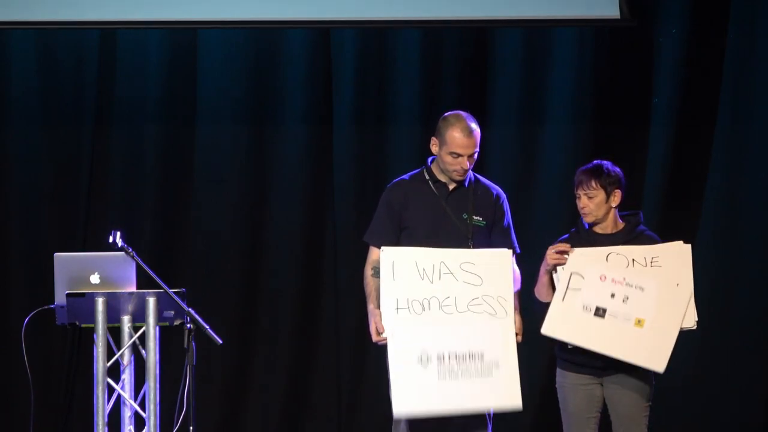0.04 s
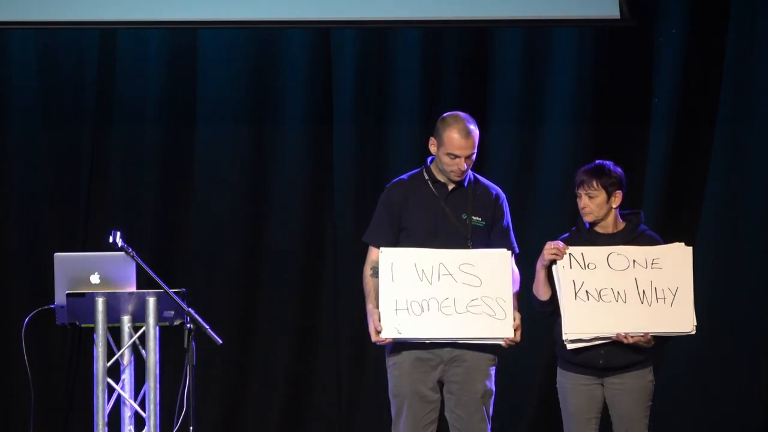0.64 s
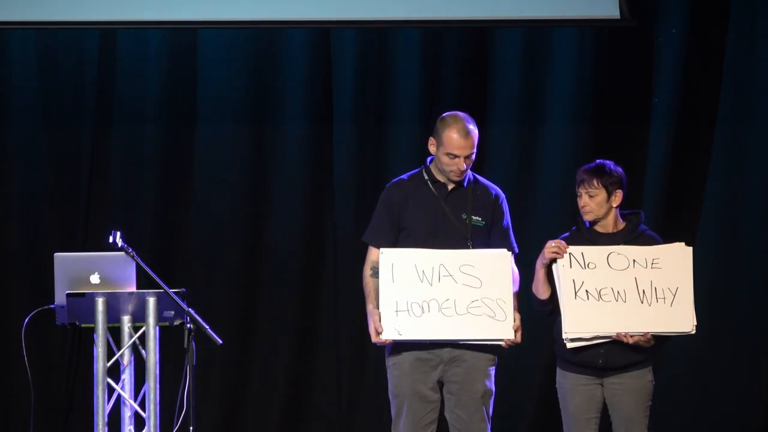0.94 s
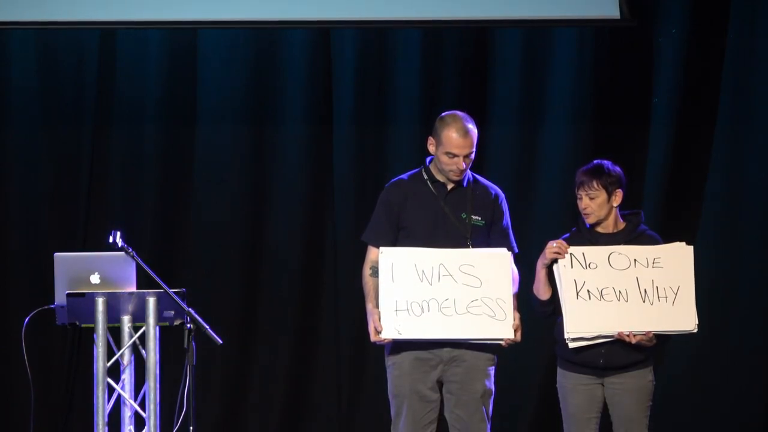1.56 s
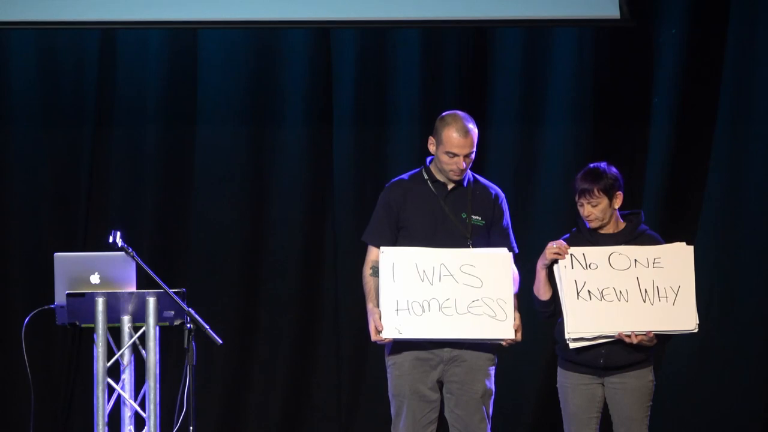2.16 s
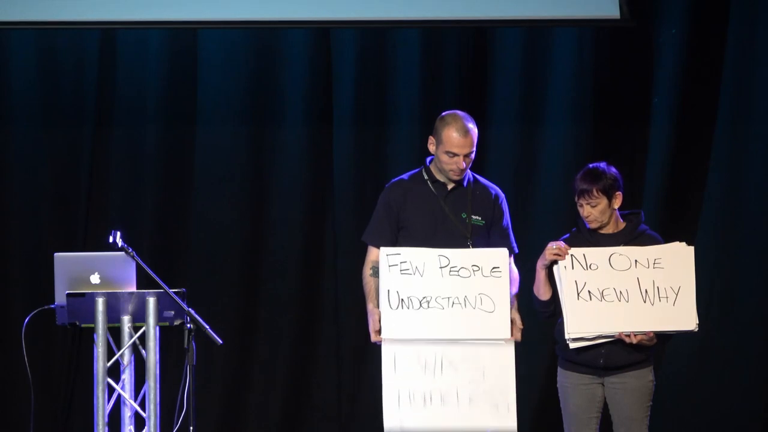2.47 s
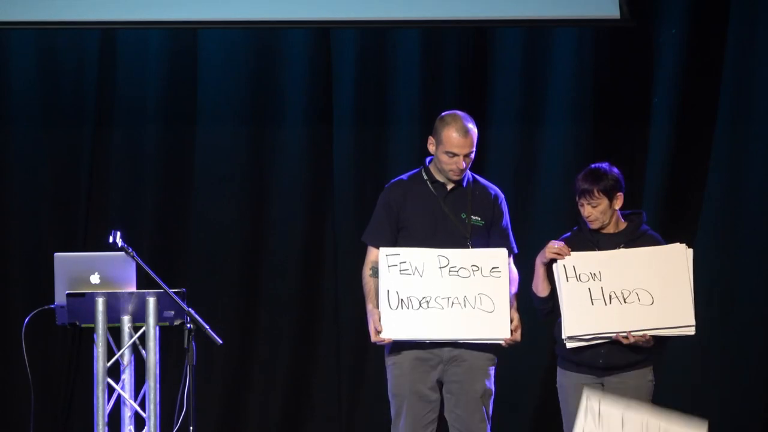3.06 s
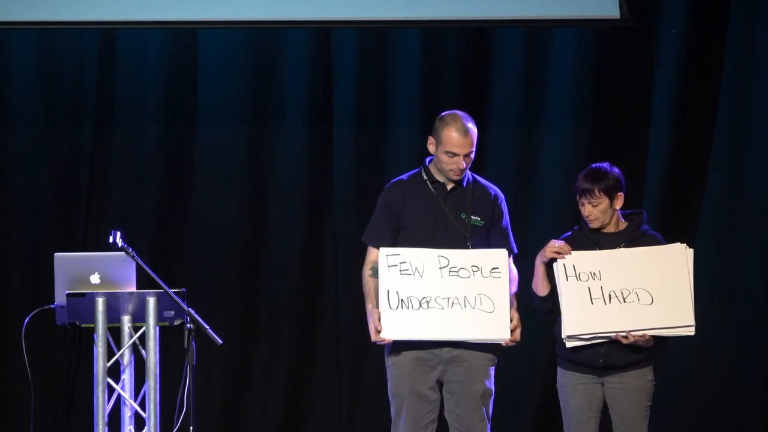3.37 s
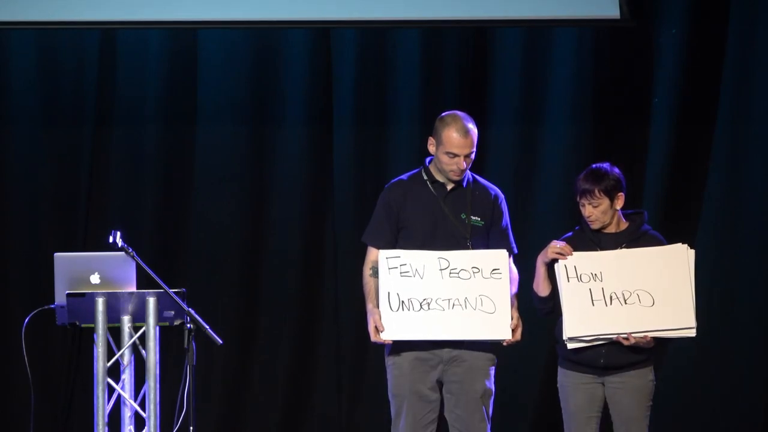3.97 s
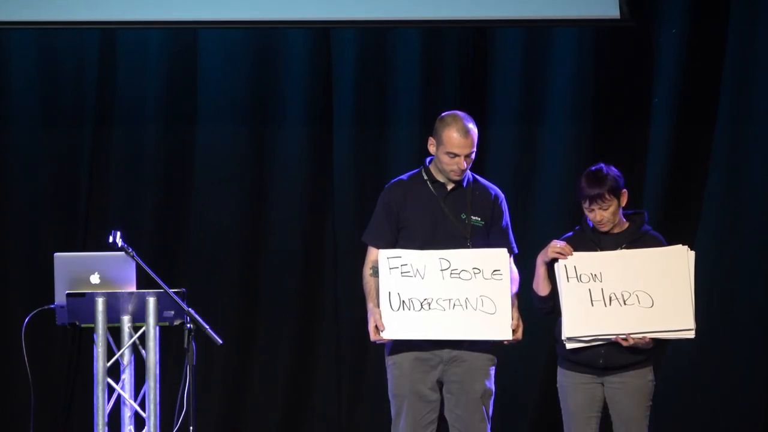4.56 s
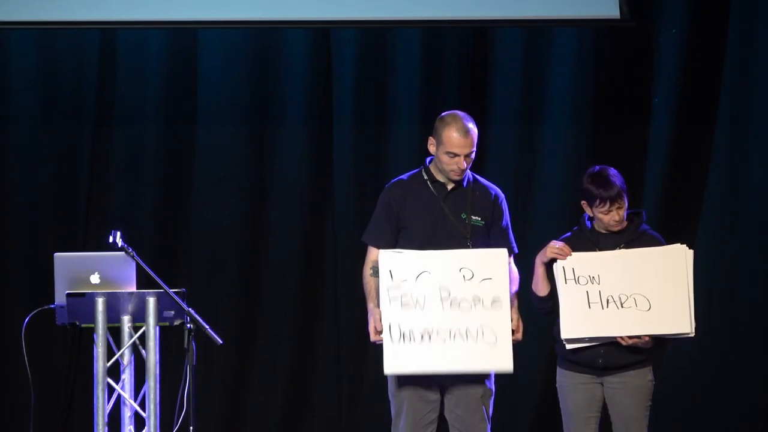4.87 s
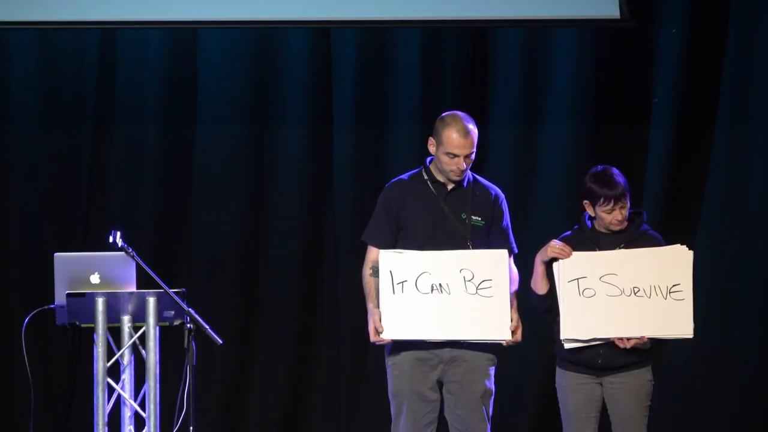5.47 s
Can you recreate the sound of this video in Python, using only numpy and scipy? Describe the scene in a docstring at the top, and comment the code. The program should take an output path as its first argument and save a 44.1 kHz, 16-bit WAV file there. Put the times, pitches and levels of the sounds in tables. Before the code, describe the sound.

Stiff cards knock and slap onto a stage in a reverberant hall, with a dull thump just before the last one.

```python
"""Cards dropped on a stage

Four large stiff cards fall in turn onto a hard stage floor. Each lands with a sharp knock, followed by
one or more slaps or ticks; the impacts ring the card and the boards, and the hall answers with a loud
wash and a long faint tail. A dull thump sets the hall hissing before the last card.
The sharpest blows overload the microphone."""
import sys
import numpy as np
from scipy import signal
from scipy.fft import rfft, irfft
from scipy.io import wavfile

SR = 44100
rng = np.random.default_rng(int(sys.argv[2]) if len(sys.argv) > 2 else 0)


def dump_mix(stems):
    """Bounce the given channels to the path in sys.argv[1] as a 16-bit WAV at rate SR."""
    frames = np.atleast_2d(stems).T  # one column per channel
    limited = np.clip(frames, -1, 1)  # hard clip at full scale
    pcm = np.round(limited * 32767).astype(np.int16)
    wavfile.write(sys.argv[1], SR, pcm)


N = 243431
T = np.arange(N) / SR
TAPS = 4096  # samples in a short impulse response

# mains hum, averaged over the channels: (frequency [Hz], rms level [dB])
HUM_PARTIALS = [(50, -74), (151, -74.5)]
# each card's voice: (applies from [s], ring prominence [dB], bass gain [dB])
CARD_VOICES = [(0.1, 5.5, 0), (2.4, 5, 8.5), (2.9, 12.5, -0.5), (4.9, 8.5, -2.5)]
# an edge lands: (time [s], direct level [dB], level into the hall [dB], ring [Hz], treble gain [dB])
EDGE_LANDINGS = [ (0.3806, 11.5, -4, 1850, -8), (0.391, 17.5, 19.5, 803, 2), (2.7640, 15.5, 18, 348, 7.5),
                 (3.2465, 16.5, 15, 266, 10.5), (5.2680, 19.5, 13.5, 1800, 5.5), ]
# a face slaps down: (time [s], direct level [dB], level into the hall [dB], ring [Hz])
FACE_SLAPS = [ (0.4300, 8, 21, 2000), (0.4666, 9.5, 18.5, 1380), (0.5490, 1, 12.5, 1400),
              (0.5865, 14, 14, 645), (3.2775, 15.5, 20.5, 1616), (3.287, 8.5, 20.5, 990),
              (3.3520, 11.5, 22, 983), (3.4370, 6.5, 16.5, 924), (5.2741, 16, 21.5, 1160),
              (5.3438, 12, 20, 1730), (5.4142, 9, 17.5, 1190), (5.5004, 23, 13, 1500), ]
# a corner ticks on the floor: (time [s], direct level [dB], level into the hall [dB])
CORNER_TAPS = [(0.53, 11.5, 10), (0.6060, 2, -0.5), (0.6823, 3.5, -18.5), (2.8386, 3, 7.5)]
# spectral envelope of an impact: (frequency [Hz], relative level [dB])
IMPACT_SPECTRUM = [(30, -34), (70, -18), (130, -1), (300, -3), (1000, 1.5), (2100, 0.5), (3200, -2),
                   (4500, -7.5), (7500, -17), (10000, -21), (13000, -30.5), (16000, -35.5)]
# resonances and antiresonances of the stage, and the microphone's notch at 5.6 kHz: (centre [Hz], width
# [octaves], gain [dB])
STAGE_AND_MIC_RESONANCES = [(380, 0.17, 1.5), (493, 0.11, -4.5), (657, 0.21, 4.5), (995, .08, 3.5),
                            (1220, 0.28, -5), (5630, .13, -8.5), (8000, 0.1, 3)]
# decay of the hall's loud wash: (frequency [Hz], reverberation time [s])
WASH_DECAY = [(80, 0.96), (250, 1.1), (800, 0.89), (2000, 1.16), (4000, 0.93), (8000, 0.34), (15000, 0.24)]
# the hall's long tail: (frequency [Hz], level relative to the wash [dB], reverberation time [s])
TAIL_BANDS = [(80, -8, 3.1), (200, -15, 3.5), (800, -12, 2.82), (2000, -18, 3.48), (4550, -13, 2.72),
              (8000, -14.5, 3.3), (15000, -1, 2.5)]
# an edge slides on the boards: (time [s], duration [s], rms level [dB], centre [Hz], width [octaves])
EDGE_SKIDS = [(0.676, 0.13, -42, 7700, 0.19), (2.833, 0.014, -28, 10500, .5)]
# a faint thump, then a loud one: (time [s], level [dB], starting pitch [Hz], tick [dB], hiss [dB])
DULL_THUMPS = [(4.753, -38.5, 191, -32, -15), (4.8054, -9.5, 188, -4, 13)]
# spectral envelope of a thump's tick and hiss: (frequency [Hz], relative level [dB])
THUMP_SPECTRUM = [(40, -23), (150, 3.5), (300, -0.5), (800, 4.5), (2400, 1.5), (4200, -4.5), (7500, -16),
                  (11000, -15), (16000, -16)]


def undb(db):
    """Amplitude ratio of a level in decibels."""
    return 10 ** (np.asarray(db) / 20)


def unit(x):
    """Normalisation to unit energy."""
    return x / np.sqrt(np.sum(x ** 2))


def bins(size):
    """Frequencies of a real Fourier transform, kept above zero."""
    return np.maximum(np.arange(size // 2 + 1) * SR / size, 1)


def along(table, hz, column=1):
    """Interpolation of a table column in log frequency."""
    rows = np.array(table, float)
    return np.interp(np.log(hz), np.log(rows[:, 0]), rows[:, column])


def bump(hz, centre_hz, octaves):
    """A Gaussian band in log frequency."""
    return np.exp(-.5 * (np.log2(hz / centre_hz) / octaves) ** 2)


def fade(t, t60):
    """Exponential decay of 60 dB in t60 seconds."""
    return np.exp(-np.log(1000) * t / t60)


def add(track, s, sound):
    """Superposition of a sound on a track at s seconds."""
    start = int(s * SR)
    track[start:start + len(sound)] += sound[:N - start]


def convolve(x, response):
    """Linear filtering by an impulse response."""
    return signal.fftconvolve(x, response)[:N]


def noise_floor(hiss_db=-55.0, hum_left_db=-5):
    """Uncorrelated white noise in each channel, and coherent mains hum that is stronger on the right."""
    hum = sum(undb(db) * np.sqrt(2) * np.sin(2 * np.pi * hz * T) for hz, db in HUM_PARTIALS)
    balance = undb(np.array([[1], [-1]]) * hum_left_db / 2)
    return undb(hiss_db) * rng.standard_normal((2, N)) + hum * balance


def click(db):
    """Minimum-phase impulse of unit energy: the spectrum db, coloured by the resonances of stage and
    microphone."""
    db = db + sum(gain_db * bump(bins(TAPS), hz, width) for hz, width, gain_db in STAGE_AND_MIC_RESONANCES)
    cepstrum = irfft(np.log(undb(db)))
    cepstrum[1:TAPS // 2] *= 2  # folding the cepstrum makes the impulse causal
    cepstrum[TAPS // 2 + 1:] = 0
    return unit(irfft(np.exp(rfft(cepstrum))))


def contacts(slap_treble_db=-4.5, corner_hz=4400, corner_ring_db=-3, corner_treble_db=11.5):
    """Contact shape sets the spectrum: a face is dull, a corner bright. Lists all blows in time order."""
    def voice(s):
        return max(row for row in CARD_VOICES if row[0] <= s)
    edges = [(s, db, hall_db, hz, voice(s)[1], treble) for s, db, hall_db, hz, treble in EDGE_LANDINGS]
    slaps = [(s, db, hall_db, hz, voice(s)[1], slap_treble_db) for s, db, hall_db, hz in FACE_SLAPS]
    corners = [(*tap, corner_hz, corner_ring_db, corner_treble_db) for tap in CORNER_TAPS]
    return [(*blow, voice(blow[0])[2]) for blow in sorted(edges + slaps + corners)]


def card_impacts(ring_octaves=0.25, treble_hz=10000, bass_hz=450, chatter_t60=0.012, push_db=-8,
                 shiver_db=-7, shiver_t60=0.06, boards_hz=100, boards_t60=0.26, boards_db=-21):
    """Impact excitation: the edge chatters, the sheet shivers, the boards thud. Gives (direct, hall)."""
    direct, wash, tail_input = np.zeros((3, N))
    hz, t = bins(TAPS), T[:TAPS]
    spots, tail = hall_responses()
    thud = undb(boards_db) * unit(np.sin(2 * np.pi * boards_hz * t) * fade(t, boards_t60))
    for k, (s, direct_db, hall_db, ring_hz, ring_db, treble_db, bass_db) in enumerate(contacts()):
        body = along(IMPACT_SPECTRUM, hz) + bass_db / (1 + (hz / bass_hz) ** 2)
        ring = ring_db * bump(hz, ring_hz, ring_octaves)
        tilt = treble_db * hz / treble_hz
        blow = click(body + ring + tilt)
        force = unit(rng.standard_normal(TAPS) * fade(t, chatter_t60))
        force[0] += undb(push_db)
        chatter = unit(convolve(blow, force))
        shiver = unit(convolve(click(body + ring), rng.standard_normal(TAPS) * fade(t, shiver_t60)))
        add(direct, s, undb(direct_db) * (chatter + undb(shiver_db) * shiver))
        add(direct, s, undb(direct_db) * thud)
        # successive blows fall on different spots
        add(wash, s, undb(hall_db) * convolve(spots[k % len(spots)], blow))
        # the tail gathers sound from all directions, which evens out the ring
        add(tail_input, s, undb(hall_db) * click(body + tilt))
    return direct, wash + convolve(tail_input, tail)


def diffuse(size, envelope, count=1, bands=10):
    """A diffuse field of random echoes: count rows of noise, each band shaped by envelope(hz)."""
    noise, log_hz = rfft(rng.standard_normal((count, size))), np.log(bins(size))
    centres = np.geomspace(80, 15000, bands)
    return sum(envelope(hz) * irfft(noise * np.interp(log_hz, np.log(centres), pick), size)
               for hz, pick in zip(centres, np.eye(bands)))


def hall_responses(gap_s=0.0095, swell_s=0.011, early_db=-12, early_s=0.015, bright_hz=8500, spots=4):
    """Reverberation: after a gap, early reflections and a wash for each spot, and one shared tail."""
    t = np.maximum(T[:3 * SR] - gap_s, 0)
    swell = 1 - np.exp(-t / swell_s)
    washes = diffuse(SR, lambda hz: unit(swell[:SR] * fade(t[:SR], along(WASH_DECAY, hz))), spots)

    def tail_envelope(hz):
        return undb(along(TAIL_BANDS, hz)) * unit(swell * fade(t, along(TAIL_BANDS, hz, column=2)))
    tail = diffuse(len(t), tail_envelope)[0]
    early = rng.standard_normal((spots, TAPS)) * unit(t[:TAPS] * np.exp(-(t[:TAPS] / early_s) ** 2))
    # near surfaces return more treble than the far walls
    washes[:, :TAPS] += undb(early_db) * irfft(rfft(early) * (1 + (bins(TAPS) / bright_hz) ** 2))
    return washes, tail


def skids():
    """Stick-slip friction: a sliding edge catches in tiny grains, heard as a thin hiss."""
    out = np.zeros(N)
    for s, length_s, db, centre_hz, octaves in EDGE_SKIDS:
        size = int(length_s * SR)
        grains = rng.standard_normal(SR) * rng.exponential(size=SR)
        hiss = irfft(rfft(grains) * bump(bins(SR), centre_hz, octaves), SR)[:size]
        add(out, s, undb(db) * hiss / np.std(hiss) * signal.windows.tukey(size))
    return out


def thumps(end_hz=70, sag_s=0.0078, length_s=0.016, rise_s=0.00013, hiss_t60=4.1):
    """Damped oscillation: a tick and a few low swings of falling pitch; a hiss lingers in the hall."""
    out, t = np.zeros(N), T[:TAPS]
    tick = click(along(THUMP_SPECTRUM, bins(TAPS)))
    envelope = (1 - np.exp(-t / rise_s)) * np.exp(-(t / length_s) ** 2)
    for s, db, start_hz, tick_db, hiss_db in DULL_THUMPS:
        hz = end_hz + (start_hz - end_hz) * np.exp(-t / sag_s)
        swing = -np.cos(2 * np.pi * np.cumsum(hz) / SR)
        add(out, s, undb(db) * swing * envelope - undb(tick_db) * tick)
        echoes = unit(rng.standard_normal(N) * fade(T, hiss_t60))
        add(out, s, undb(hiss_db) * convolve(echoes, tick))
    return out


def scene(left_db=2.5, spread_db=-23, spread_lag_s=0.011):
    """Mid-side stereo: the image leans left, and delayed hall sound in antiphase widens it a little."""
    direct, hall = card_impacts()
    mid = direct + hall + skids() + thumps()
    side = np.zeros(N)
    add(side, spread_lag_s, undb(spread_db) * hall)
    polarity = np.array([[1], [-1]])
    return (mid + polarity * side) * undb(polarity * left_db / 2) + noise_floor()


def record(dry, cutoff_hz=15900):
    """Saturation: the microphone flattens the loudest peaks; a steep low-pass limits the bandwidth."""
    clipped = dry / (1 + dry ** 8) ** (1 / 8)
    return signal.sosfilt(signal.ellip(10, .1, 70, cutoff_hz, fs=SR, output="sos"), clipped)


dry = scene()
out = record(dry)
dump_mix(out)
```